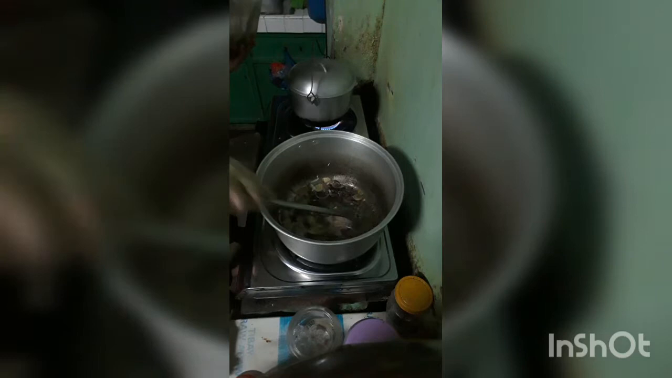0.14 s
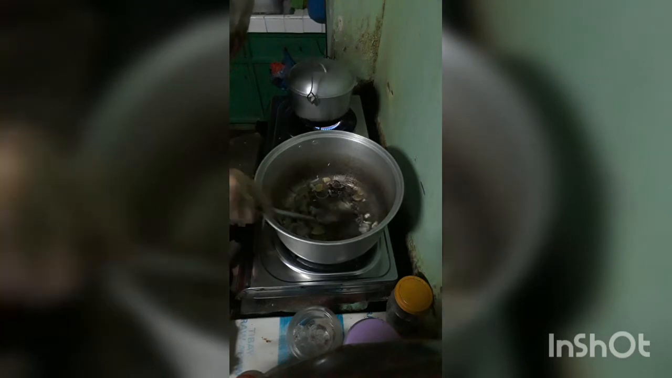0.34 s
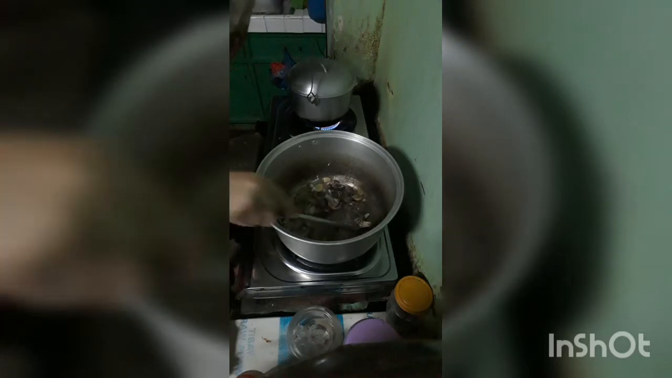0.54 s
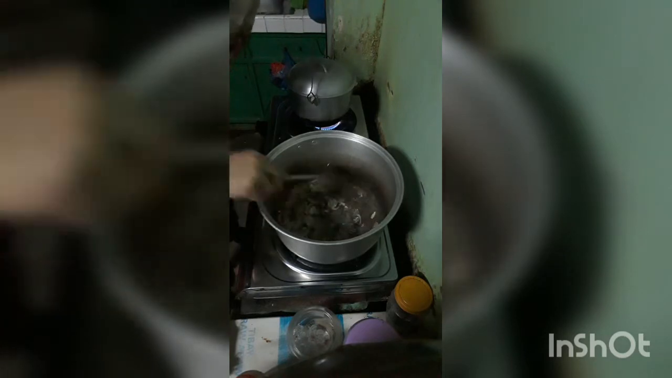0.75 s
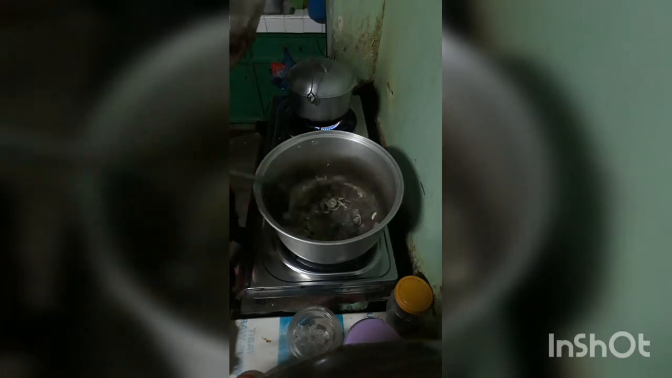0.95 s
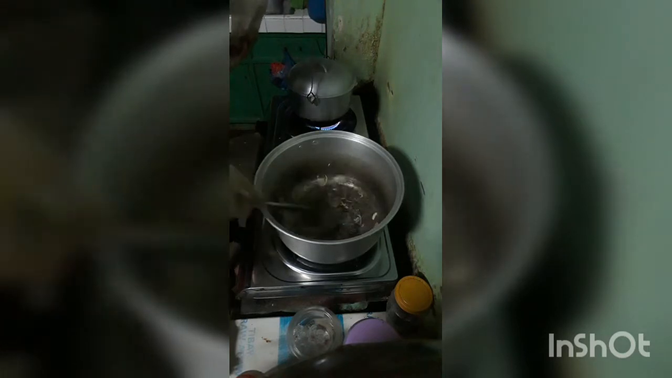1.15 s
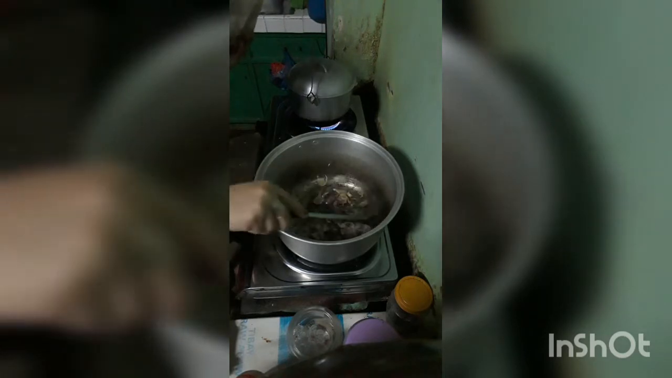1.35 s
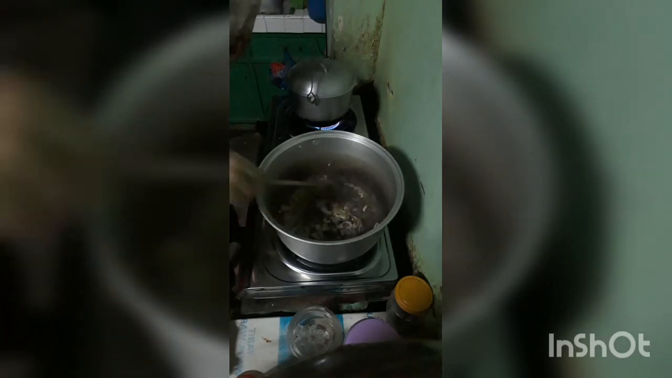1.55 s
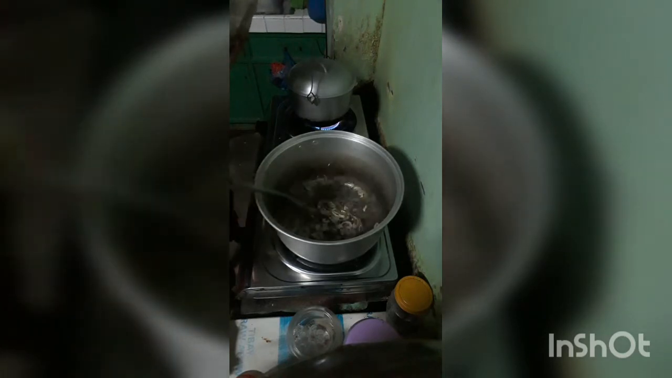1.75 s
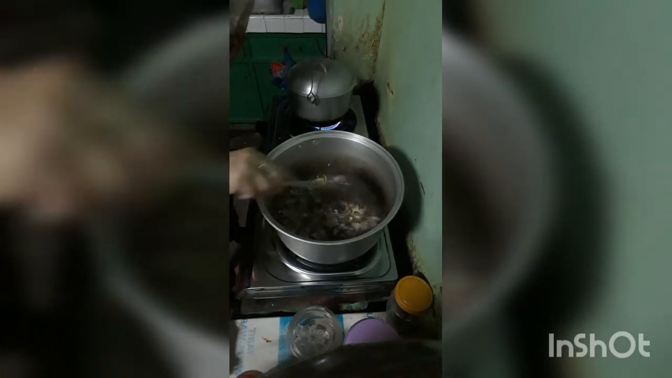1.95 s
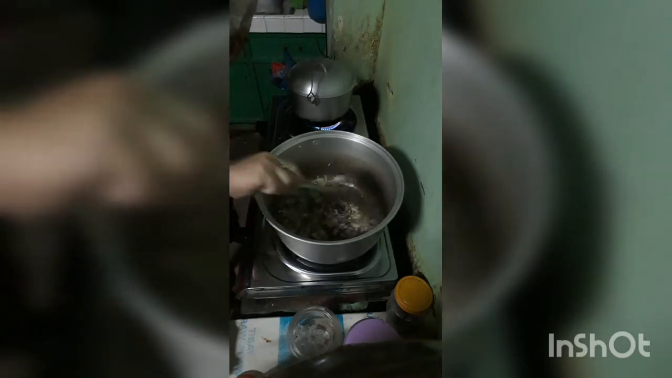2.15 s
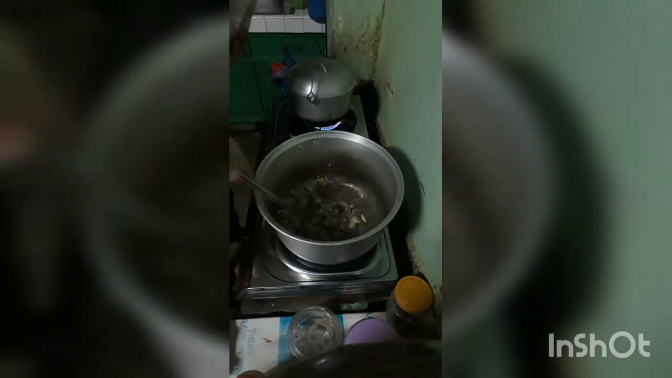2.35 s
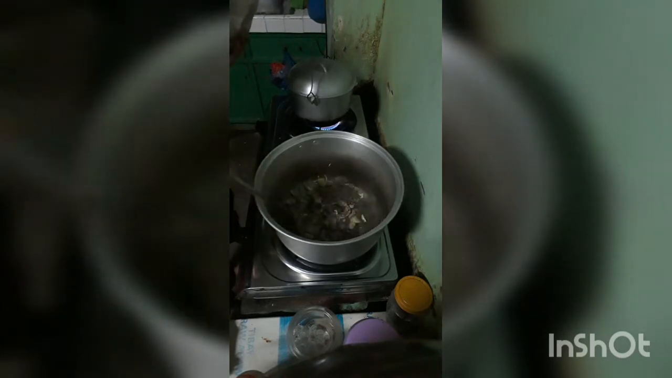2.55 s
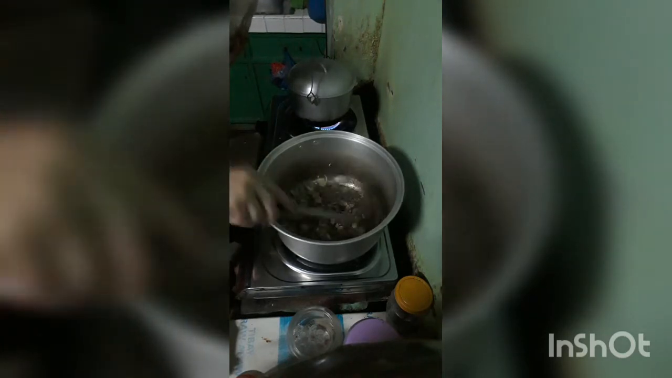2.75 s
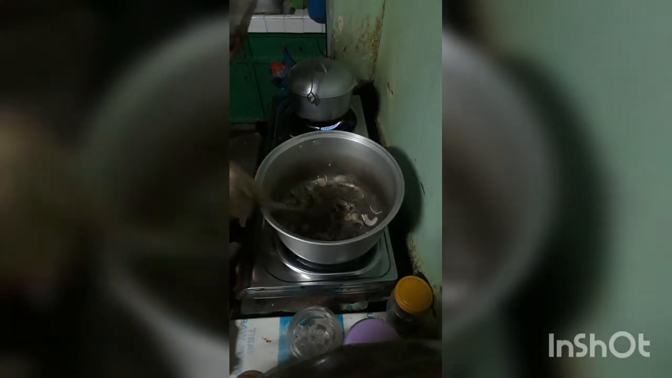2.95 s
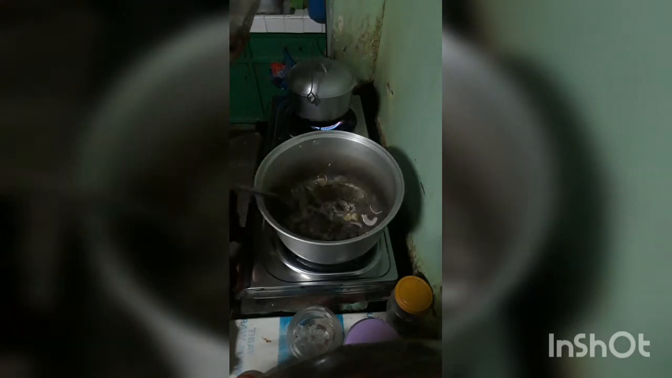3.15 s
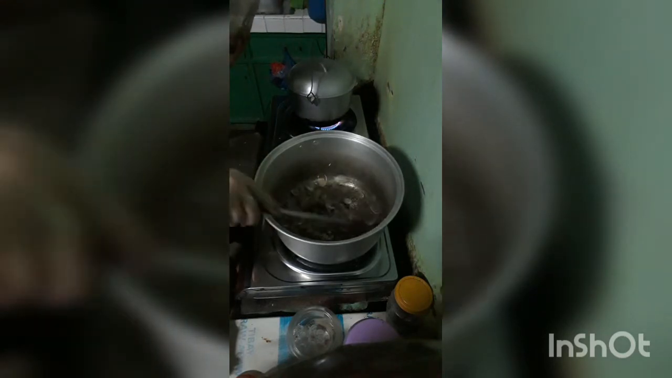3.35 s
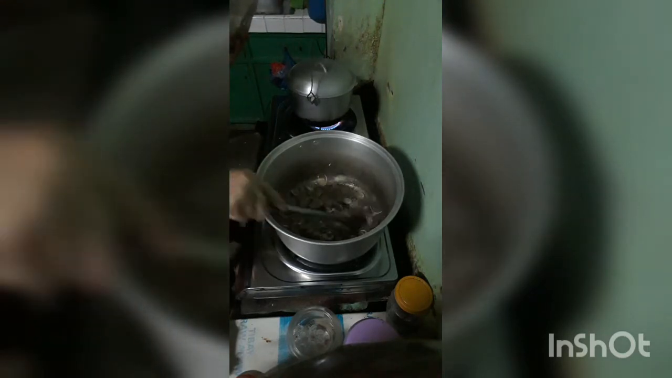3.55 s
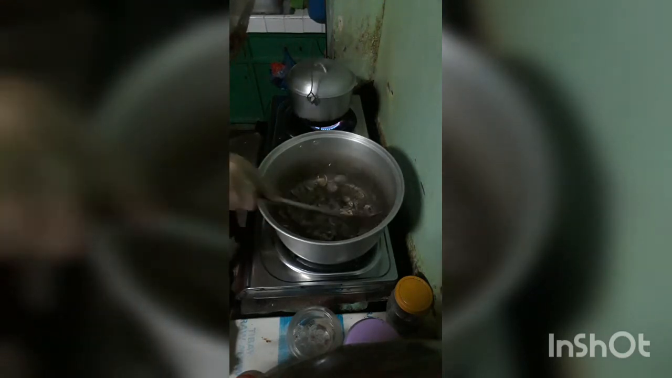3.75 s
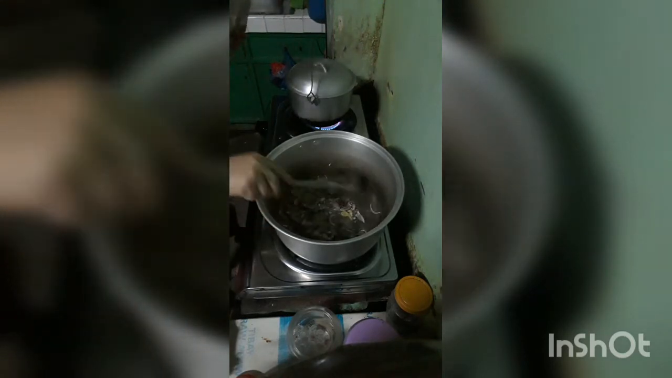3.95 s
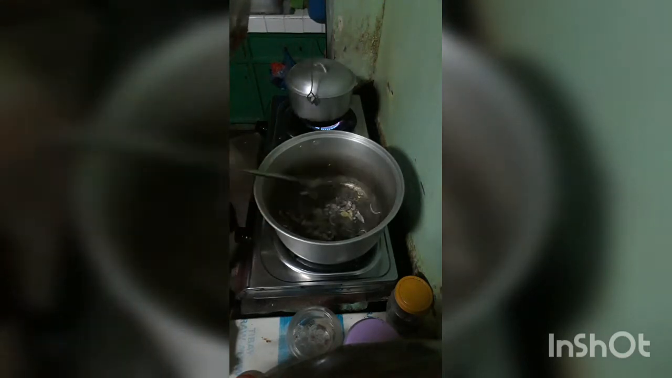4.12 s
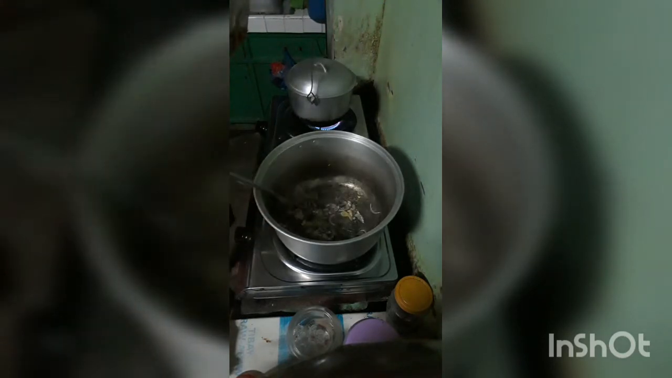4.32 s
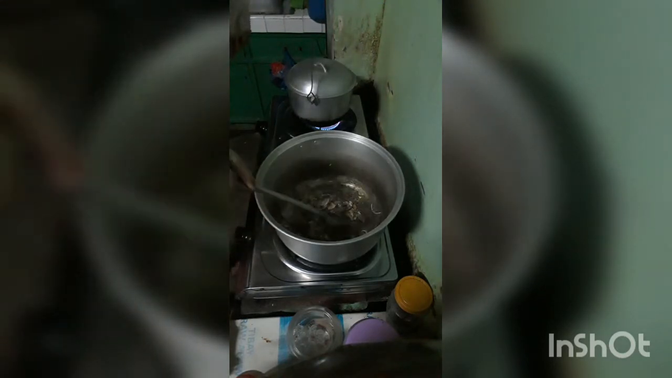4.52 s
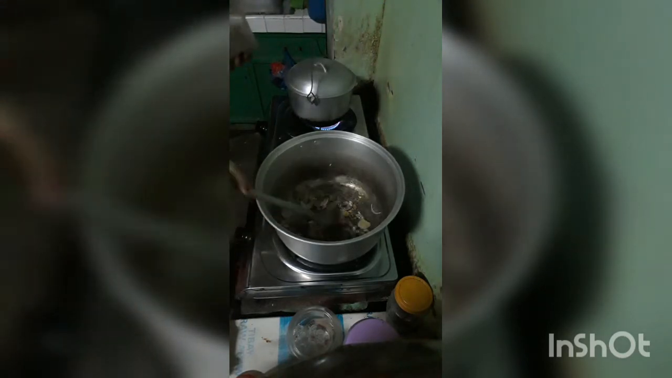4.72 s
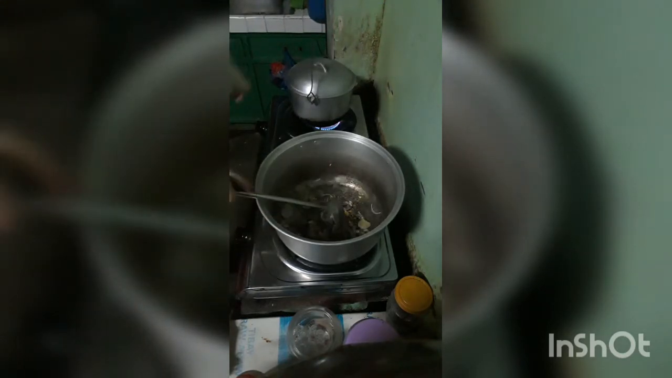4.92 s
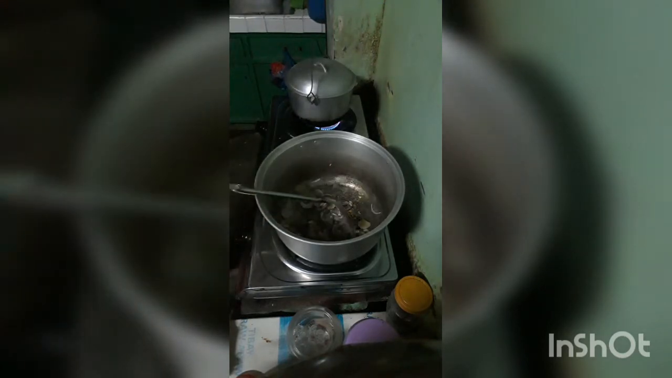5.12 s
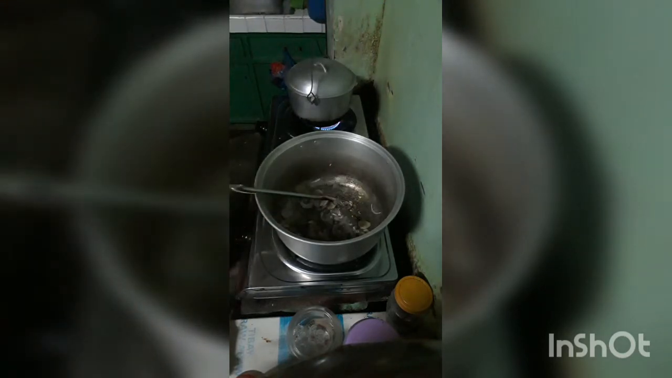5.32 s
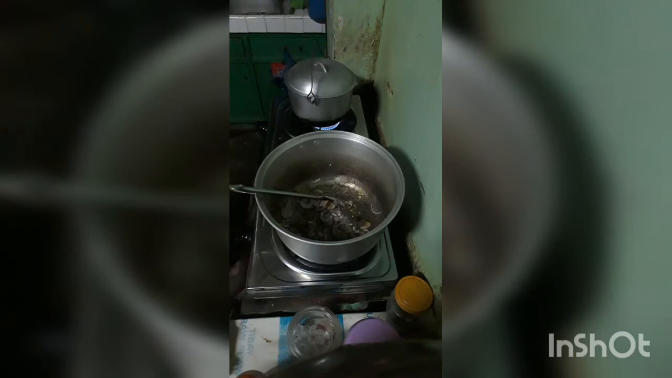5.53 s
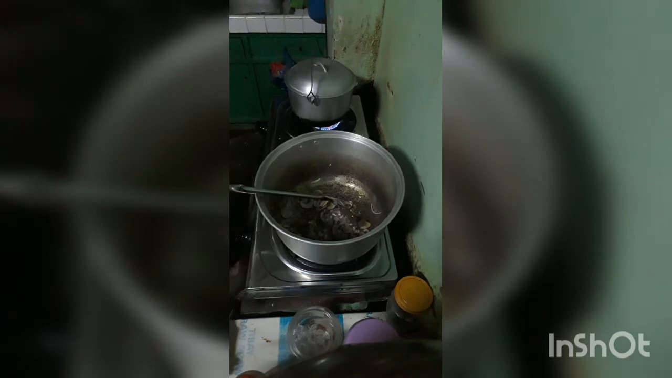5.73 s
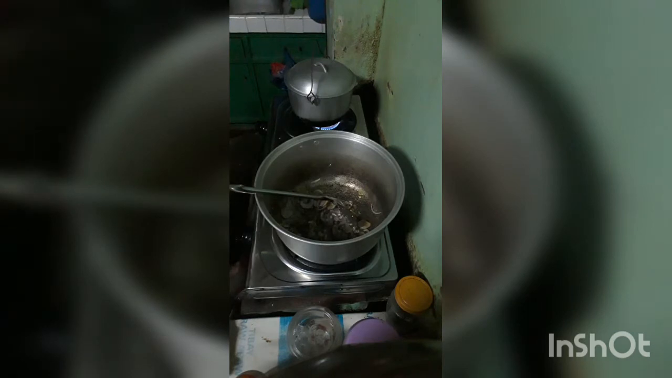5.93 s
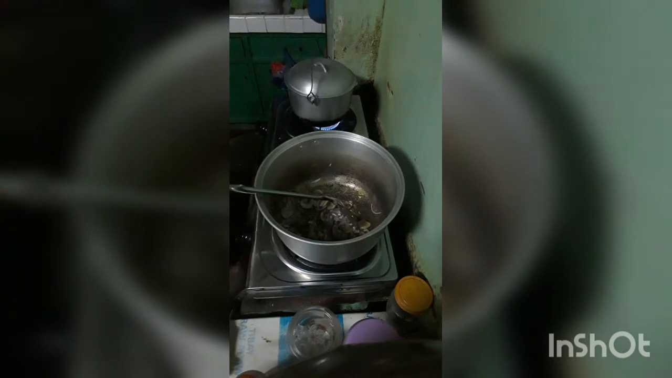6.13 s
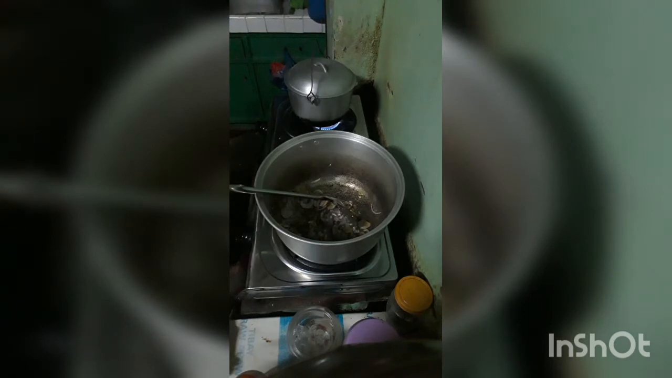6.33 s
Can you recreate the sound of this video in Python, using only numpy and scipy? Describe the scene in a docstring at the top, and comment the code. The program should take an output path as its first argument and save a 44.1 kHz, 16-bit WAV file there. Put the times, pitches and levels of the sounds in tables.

```python
"""Small kitchen, microphone above a metal pot on a gas stove: ginger, garlic and onion sizzle in oil.
Throughout, filtered noise makes the burner's rush, wavering tones a hum, and random clicks the sizzle.
A metal spoon scrapes from 0.1 s and knocks and chatters from 0.2 s, exciting decaying modes of pot and spoon;
it squeaks at 0.66 s. Flares swell the sizzle as stirs turn wet food; oil spits, loudest at 2.5 s, as bursts of tone.
The sizzle sinks after the last flare at 4.7 s; the last knock is at 5.4 s and a faint scrape follows at 6.1 s."""
import sys
import numpy as np
from scipy import signal
from scipy.fft import rfft, irfft
from scipy.io import wavfile
from scipy.ndimage import uniform_filter1d

SR = 44100
rng = np.random.default_rng(int(sys.argv[2]) if len(sys.argv) > 2 else 0)


def dump_mix(stems):
    """Bounce the given channels to the path in sys.argv[1] as a 16-bit WAV at rate SR."""
    frames = np.atleast_2d(stems).T  # one column per channel
    limited = np.clip(frames, -1, 1)  # hard clip at full scale
    pcm = np.round(limited * 32767).astype(np.int16)
    wavfile.write(sys.argv[1], SR, pcm)


N = 281358  # samples, 6.38 s


def undb(db):
    """Decibels to gain."""
    return 10 ** (np.asarray(db) / 20)


def unit(x):
    """Scale to rms 1."""
    return x / np.sqrt(np.mean(x ** 2))


def blow(x):
    """Scale a short sound to the energy of 10 ms at rms 1."""
    return x / np.sqrt(np.sum(x ** 2) / (.01 * SR))


def add(track, s, sound):
    """Mix a sound in at time s."""
    start = max(int(s * SR), 0)
    track[start:start + len(sound)] += sound[:N - start]


def colour(x, points):
    """Filter by a spectrum of (f/Hz, level/dB) points, joined on a log frequency scale."""
    hz, db = np.transpose(points)
    bins = np.maximum(np.fft.rfftfreq(len(x), 1 / SR), 1)
    gain = undb(np.interp(np.log(bins), np.log(hz), db))
    return irfft(rfft(x) * gain, len(x))


def band(x, hz, q):
    """Two-pole band-pass with gain 1 at the centre."""
    w = 2 * np.tan(np.pi * min(hz, SR / 3) / SR)
    b, a = signal.bilinear([w / q, 0], [1, w / q, w * w])
    return signal.lfilter(b, a, x)


def walk(rate):
    """Slow random wander of rms 1, from steps drawn at this rate (Hz) and smoothed twice."""
    k = int(SR / rate)
    steps = np.repeat(rng.standard_normal(N // k + 1), k)
    smooth = uniform_filter1d(uniform_filter1d(steps, k), k)
    return unit(smooth[:N])


def clicks(size, per_s, spread):
    """Randomly timed clicks, mostly small and a few large; spread is the scale of their sizes in dB."""
    sizes = undb(spread * np.minimum(rng.exponential(size=size), 5))
    happens = rng.random(size) < per_s / SR
    return unit(happens * sizes * rng.choice([-1, 1], size))


def fade(t, t60):
    """Exponential decay that loses 60 dB in t60."""
    return np.exp(-np.log(1000) * t / t60)


ROOM_T60_S, ROOM_DB = 0.31, -10.5  # room tail: decay, energy relative to the direct sound


def kitchen(x, first_echo_s=0.0031):
    """Close hard walls add a short tail of decaying noise."""
    t = np.arange(SR // 2) / SR
    tail = rng.standard_normal(len(t)) * fade(t, ROOM_T60_S) * (t > first_echo_s)
    tail = tail / np.sqrt(np.sum(tail ** 2))
    return x + undb(ROOM_DB) * signal.fftconvolve(x, tail)[:N]


# spectrum of the burner and room: f/Hz, relative level/dB per Hz
BURNER_SPECTRUM = [(25, -46), (45, -28), (65, -1.5), (100, -0.5), (130, 2), (170, 4.5), (250, 2.5),
                   (330, 0.5), (450, -0.5), (620, -2.5), (900, 3.5), (1500, -3.5), (3000, -2.5),
                   (6000, -17.5)]
# partials of the hum: f/Hz on average, rms level/dB
HUM_PARTIALS = [(105, -52), (209.5, -47), (315, -58)]


def background(burner_db=-43, waver_db=2, drift=0.01375):
    """The steady rush of the flame is coloured noise; each partial of the hum wavers in pitch and level."""
    hum = 0
    for hz, db in HUM_PARTIALS:  # perhaps a fan
        phase = 2 * np.pi * np.cumsum(hz * (1 + drift * walk(22))) / SR
        partial = np.sin(phase) * undb(waver_db * walk(9.1))
        hum = hum + undb(db) * unit(partial)
    burner = unit(colour(rng.standard_normal(N), BURNER_SPECTRUM))
    return hum + undb(burner_db) * burner


# how hard the oil fries between flares: t/s, relative level/dB
FRYING_LEVEL = [(0, -26), (1.0, -27.5), (3.7, -28), (3.92, -31), (4.3, -32.5), (4.8, -30), (5.35, -31),
                (5.53, -34.5), (6.38, -36.5)]
# stirs that turn wet food onto the hot metal: t/s at the peak, relative level/dB
STIR_FLARES = [(.3, -30), (.48, -29), (.73, -22.5), (1.35, -27.5), (2.4, -28), (3.25, -33.5), (3.51, -27.5),
               (4.06, -30), (4.72, -29)]
FLARE_RISE_S, FLARE_FALL_S = 0.085, 0.12


def frying_db():
    """Relative level of the sizzle: each flare swells and boils off, adding its power to the steady frying."""
    t = np.arange(N) / SR
    power = undb(np.interp(t, *np.transpose(FRYING_LEVEL))) ** 2
    for s, db in STIR_FLARES:
        width = np.where(t < s, FLARE_RISE_S, FLARE_FALL_S)
        flare = undb(db) * np.exp(-((t - s) / width) ** 2)
        power = power + flare ** 2
    return 10 * np.log10(power)


# colour of the bursting steam bubbles: f/Hz, relative level/dB
BUBBLE_SPECTRUM = [(500, -29.5), (1100, -24.5), (2200, -20.5), (4000, -14.5), (4900, -12), (5600, -7.5),
                   (6700, -4.5), (7900, -5), (8700, 0.5), (9500, -2.5), (10800, -0.5), (12200, -6),
                   (13500, -8), (15600, -12)]


def sizzle(fizz_db=3, crackle_db=-10, flutter_db=0.82):
    """Countless steam bubbles burst in the oil as clicks; sparser, more uneven ones crackle on top."""
    fizz = unit(colour(clicks(N, per_s=16000, spread=2.5), BUBBLE_SPECTRUM))
    crackle = unit(colour(clicks(N, per_s=450, spread=5.3), BUBBLE_SPECTRUM))
    level = undb(frying_db() + flutter_db * walk(60))
    return level * (undb(fizz_db) * fizz + undb(crackle_db) * crackle)


# the loudest spits of oil: t/s, starting amplitude as level/dB
OIL_SPITS = [(.629, -5.5), (2.546, 0), (3.318, -8), (4.736, -9), (5.236, -6), (5.290, -11), (5.563, -11),
             (5.690, -8)]


def spits(hz=9500, t60=0.0015):
    """A droplet of water bursts in the oil: a fast-dying tone whose pitch varies from spit to spit."""
    out, t = np.zeros(N), np.arange(SR // 200) / SR
    for s, db in OIL_SPITS:
        pitch = hz * (1 + 0.07 * rng.standard_normal())
        add(out, s, undb(db) * fade(t, t60) * np.sin(2 * np.pi * pitch * t))
    return out


def ring(modes, t, scatter_db=1, detune=0.005):
    """Sum of decaying modes; each contact point flips, weighs and loads them a little differently."""
    hz, db, t60 = np.transpose(modes)[:, :, None]
    side, weight, load = rng.standard_normal((3, len(modes), 1))
    size = np.sign(side) * undb(db + scatter_db * weight)
    motion = size * fade(t, t60) * np.sin(2 * np.pi * hz * (1 + detune * load) * t)
    # thin metal radiates almost nothing below its lowest mode
    high_pass = signal.butter(4, 0.86 * hz.min(), "high", fs=SR, output="sos")
    return signal.sosfilt(high_pass, motion.sum(axis=0))


# modes of the pot bottom, damped by food and trivet: f/Hz, relative level/dB, t60/s
BOTTOM_MODES = [(203, -8.5, 0.19), (225.3, -14.5, 0.27), (324.7, -1, 0.15), (372.6, 1.5, 0.15),
                (453, -9, 0.098), (539.5, -3.5, 0.063), (619, -14.5, 0.035), (705, -10, 0.1)]


def bottom_ring(t):
    """Low, damped modes of the pot bottom."""
    return ring(BOTTOM_MODES, t)


# modes of the pot wall: f/Hz, relative level/dB, t60/s
WALL_MODES = [(681, -3.5, 0.097), (749, -4.5, 0.11), (847, -3.5, 0.072), (999, -3, 0.11),
              (1059, 1.5, 0.067), (1131, -6, 0.061), (1387, -11, 0.067), (1670, -12, 0.015),
              (1820, -4, 0.033)]


def wall_ring(t):
    """Middle modes of the pot wall."""
    return ring(WALL_MODES, t)


# modes of the spoon and the rim that it touches: f/Hz, relative level/dB, t60/s
SPOON_MODES = [(2230, 13, 0.018), (2630, 7, 0.086), (3195, 7.5, 0.062), (3320, -2, 0.072),
               (4200, -26, 0.014), (4570, -15, 0.1), (5730, 5, 0.042), (5960, 12, 0.078), (6250, -11, .06),
               (6400, 17, 0.015), (7550, -8, 0.022), (8760, 32.5, 0.0062)]
# the crowd of weaker high modes: f/Hz, relative level/dB
SHIMMER_SPECTRUM = [(700, -27), (1500, 8.5), (3000, 0.5), (6500, 8), (9000, 6), (12000, -19), (15500, -3)]


def spoon_ring(t, hz, q, shimmer_db=3, shimmer_t60=0.04, skirt_share=0.29):
    """Bright response of spoon and rim, centred on the pitch given by each contact."""
    shimmer = colour(rng.standard_normal(len(t)), SHIMMER_SPECTRUM) * fade(t, shimmer_t60)
    metal = blow(ring(SPOON_MODES, t)) + undb(shimmer_db) * blow(shimmer)
    # the second, broader band-pass steepens the skirts
    return band(band(metal, hz, q), hz, skirt_share * q)


# spoon dragged over the metal: t/s at the middle, length/s, pot bottom level/dB, spoon level/dB,
# centre of the rasp f/Hz
SPOON_SCRAPES = [(0.134, 0.053, -41, -35.5, 3000), (0.361, 0.12, -36.5, -26.5, 4300),
                 (0.721, .15, -39, -17.5, 6900), (.813, 0.099, -35, -44, 5000),
                 (1.076, 0.093, -38, -29, 5430), (1.193, .15, -34.5, -35.5, 2510),
                 (2.201, 0.097, -33.5, -38, 2670), (2.292, 0.073, -29.5, -23.5, 3630),
                 (2.714, .19, -33.5, -37.5, 3500), (2.952, .12, -41, -32.5, 2500),
                 (3.995, .11, -33, -29.5, 2930), (4.446, .13, -39, -37, 4000),
                 (5.351, .11, -47.5, -37.5, 2100), (6.091, 0.1, -51, -40, 2500)]
RASP_Q, SCRAPE_WALL_DB = 0.86, -3  # sharpness of the rasp; pot wall relative to the bottom


def scrapes(pressed_t60=.15):
    """Stick and slip: a swelling run of tiny catches rings the metal, damped by the pressing spoon."""
    out, t = np.zeros(N), np.arange(SR // 4) / SR
    for s, length, pot_db, spoon_db, hz in SPOON_SCRAPES:
        pressure = np.sin(np.pi * np.minimum(t / length, 1))
        slips = clicks(len(t), per_s=1500, spread=3.7) * pressure
        parts = [(bottom_ring(t), pot_db),
                 (wall_ring(t), pot_db + SCRAPE_WALL_DB),
                 (spoon_ring(t, hz, RASP_Q), spoon_db)]
        for response, db in parts:
            rasp = signal.fftconvolve(slips, response * fade(t, pressed_t60))
            # each part carries the energy of the pressure curve, at its own level
            match = np.sqrt(np.sum(pressure ** 2) / np.sum(rasp ** 2))
            add(out, s - length / 2, undb(db) * rasp * match)
    return out


def squeak(start_s=.664, length_s=.036, hz=3170, q=12, db=-18.0):
    """Once the spoon's edge catches, and its slips ring in one narrow band."""
    out, t = np.zeros(N), np.arange(SR // 4) / SR
    pressure = np.sin(np.pi * np.minimum(t / length_s, 1))
    slips = clicks(len(t), per_s=2400, spread=2.1) * pressure
    sound = blow(signal.fftconvolve(slips, spoon_ring(t, hz, q)))
    add(out, start_s, undb(db) * sound)
    return out


# the clank is centred midway, in log frequency, between CLANK_PULL_HZ and the note of the contact point;
# its sharpness doubles for each GLANCE_DB that the spoon is louder than the pot
CLANK_PULL_HZ, CLANK_Q, GLANCE_DB = 6340, 0.54, 14.5
RING_Q, RING_DB = 7.3, -6  # the narrow note, relative to the clank


def clink(t, hz, glance_db):
    """A broad clank, purer for glancing blows, plus the narrow note that the contact point favours."""
    clank_q = CLANK_Q * 2 ** (max(glance_db, 0) / GLANCE_DB)
    clank = spoon_ring(t, np.sqrt(hz * CLANK_PULL_HZ), clank_q)
    note = spoon_ring(t, hz, RING_Q)
    return blow(clank) + undb(RING_DB) * blow(note)


# spoon blows: t/s, pot bottom level/dB, pot wall level/dB, spoon level/dB, note of the clink f/Hz,
# time constant of the chatter t/s
SPOON_BLOWS = [(.197, -28.5, -31.5, -30, 2900, 0.018), (.305, -25, -52, -44, 3050, 0.012),
               (.775, -37, -31, -44, 4000, 0.017), (1.022, -30.5, -32, -17.5, 3330, 0.014),
               (1.127, -17.5, -14.5, -25.5, 1690, 0.0087), (1.438, -13.5, -28.5, -17, 2510, 0.034),
               (1.511, -41, -32.5, -20.5, 1850, 0.026), (1.735, -23.5, -22, -15, 3170, .024),
               (1.761, -17.5, -30.5, -27, 3500, 0.0085), (2.156, -29, -40, -16.5, 2620, 0.037),
               (2.280, -15, -32, -15.5, 5740, 0.0084), (2.333, -27, -33.5, -22, 2190, 0.017),
               (2.625, -23.5, -35, -29, 3450, 0.015), (2.881, -16.5, -24, -15.5, 3050, 0.023),
               (3.175, -49, -48, -25.5, 4130, 0.0081), (3.318, -54, -54, -23, 7500, 0.014),
               (3.477, -35, -38.5, -18, 6060, 0.011), (3.882, -16, -29, -18.5, 2560, 0.017),
               (4.077, -29, -36, -23, 5900, .014), (4.340, -29, -52, -36.5, 3000, 0.007),
               (4.395, -24, -54, -40, 3000, .015), (4.672, -15.5, -31.5, -30, 5000, 0.023),
               (4.936, -20.5, -23.5, -18, 5500, 0.015), (5.426, -55, -39, -31.5, 3140, .012)]
BOUNCE_S, BOUNCE_DB = .022, -9  # the spoon falls back once after each blow


def knocks(bottom_chatter_db=-8, wall_chatter_db=-4, spoon_chatter_db=12):
    """Each blow is one push and a bounce, both with a chatter of spoon on metal that dies away."""
    out, t = np.zeros(N), np.arange(SR // 4) / SR
    push = blow(signal.unit_impulse(len(t)))
    for s, bottom_db, wall_db, spoon_db, hz, decay in SPOON_BLOWS:
        glance_db = spoon_db - max(bottom_db, wall_db)
        for delay, contact_db in [(0, 0), (BOUNCE_S, BOUNCE_DB)]:
            chatter = blow(clicks(len(t), per_s=2700, spread=2.1) * np.exp(-t / decay))
            parts = [(bottom_ring(t), bottom_db, bottom_chatter_db),
                     (wall_ring(t), wall_db, wall_chatter_db),
                     (clink(t, hz, glance_db), spoon_db, spoon_chatter_db)]
            for response, db, chatter_db in parts:
                force = push + undb(chatter_db) * chatter
                sound = blow(signal.fftconvolve(force, response))
                add(out, s + delay, undb(db + contact_db) * sound)
    return out


def scene():
    """Everything reaches one microphone above the pot, the same in both channels."""
    spoon = kitchen(knocks() + scrapes() + squeak())
    mono = spoon + sizzle() + spits() + background()
    return np.array([mono, mono])


TOP_HZ, CEILING = 15750, .8  # upper edge of the passband; amplitude that rounded peaks approach


def record(dry):
    """The phone rounds the tallest peaks and cuts the top."""
    rounded = dry / (1 + (dry / CEILING) ** 6) ** (1 / 6)
    low_pass = signal.ellip(12, .1, 90, TOP_HZ, fs=SR, output="sos")
    return signal.sosfilt(low_pass, rounded)


dry = scene()
out = record(dry)
dump_mix(out)
```